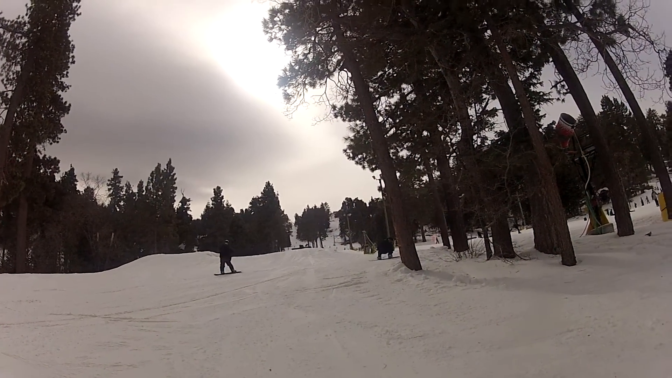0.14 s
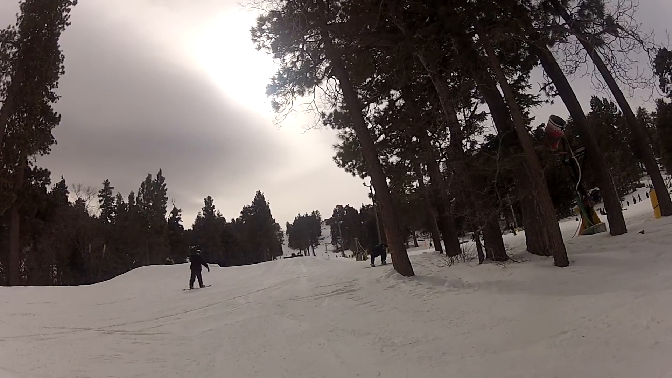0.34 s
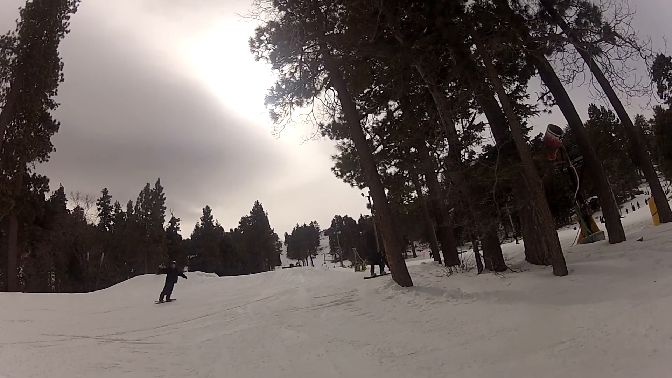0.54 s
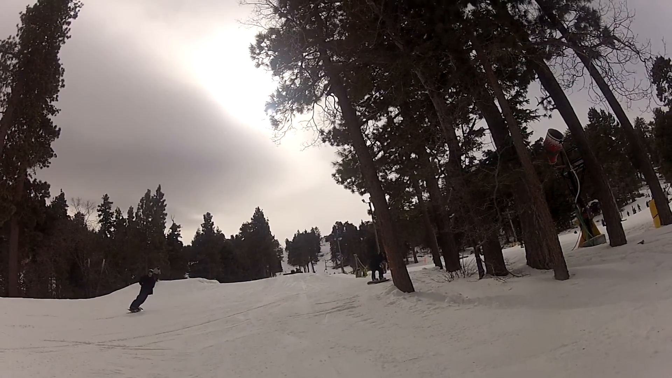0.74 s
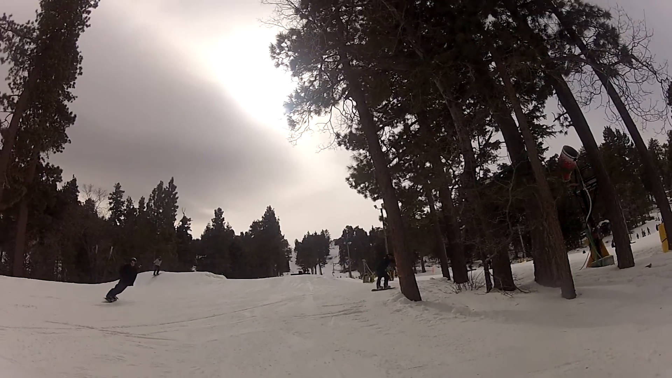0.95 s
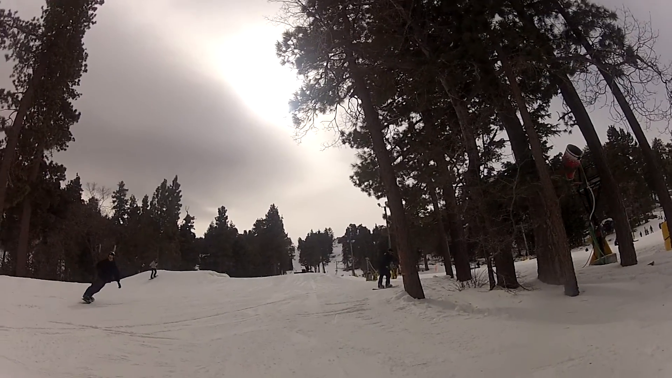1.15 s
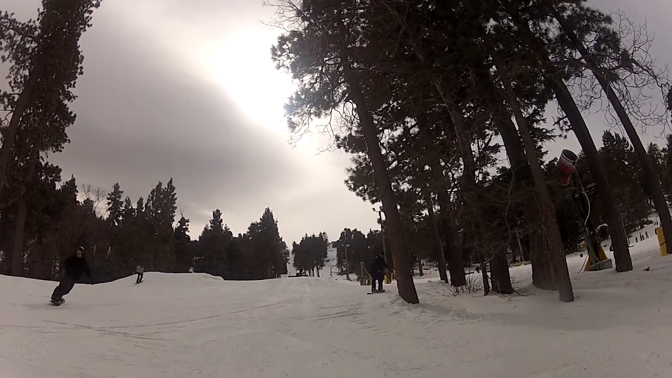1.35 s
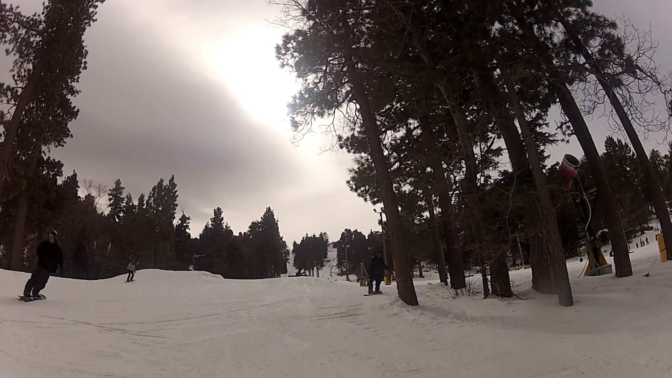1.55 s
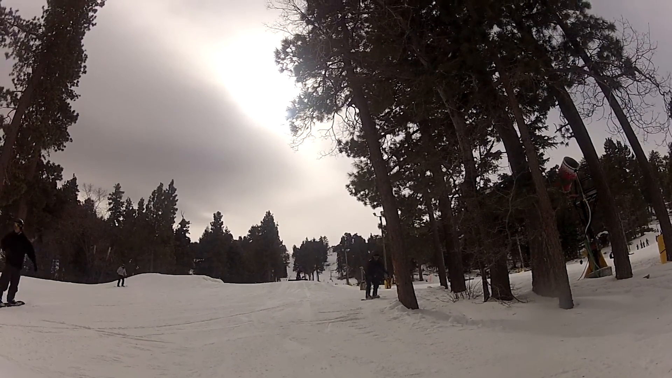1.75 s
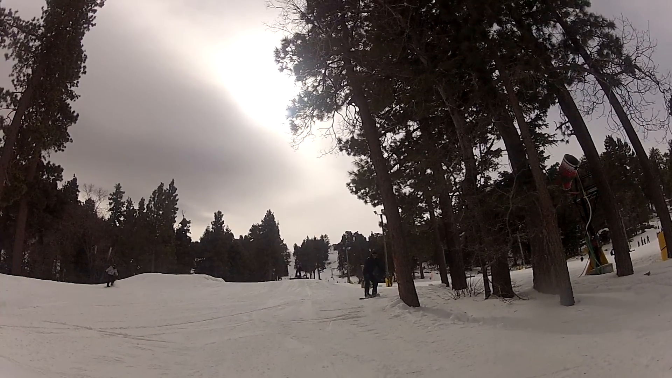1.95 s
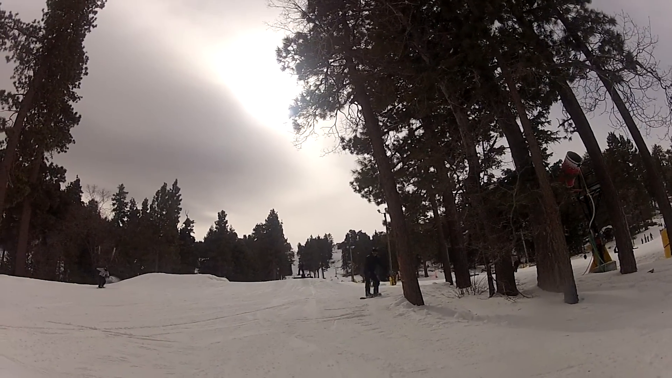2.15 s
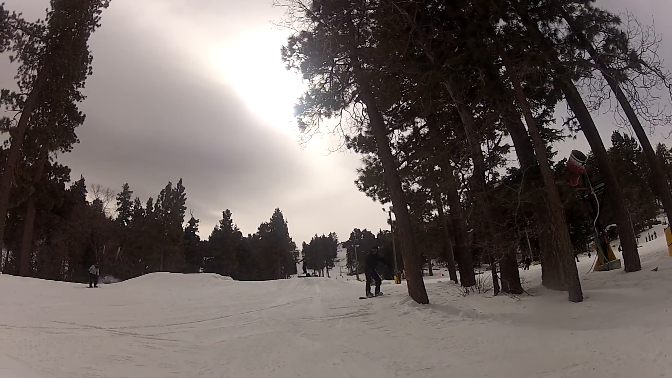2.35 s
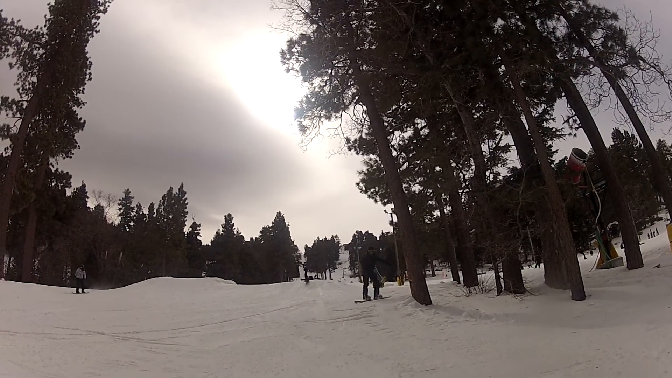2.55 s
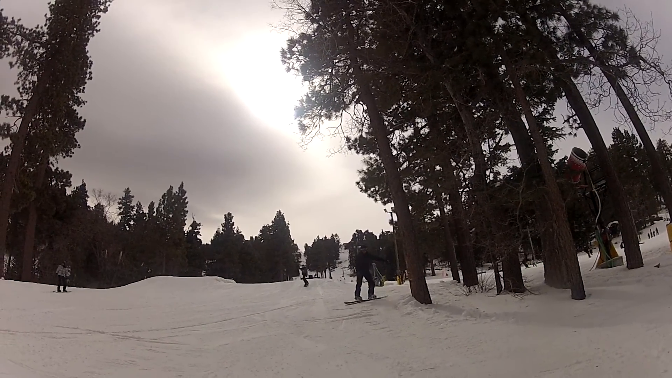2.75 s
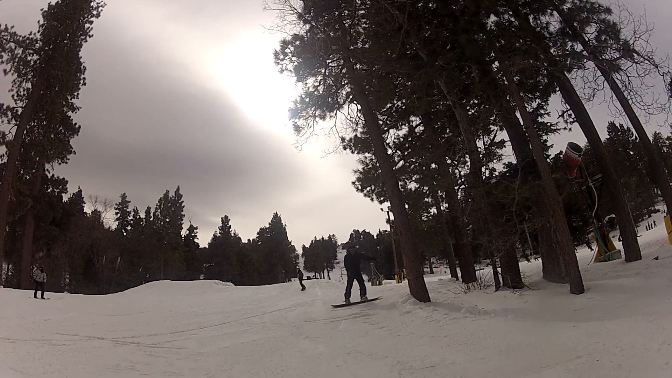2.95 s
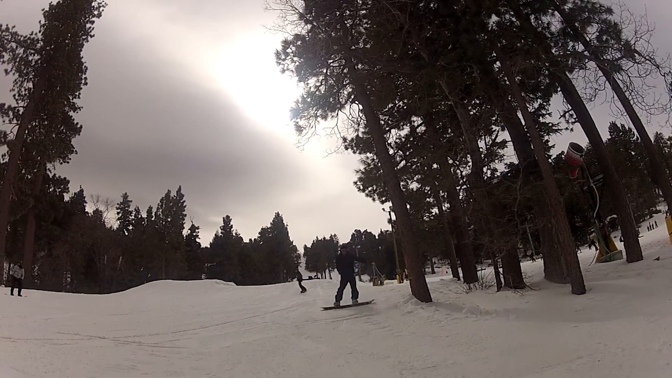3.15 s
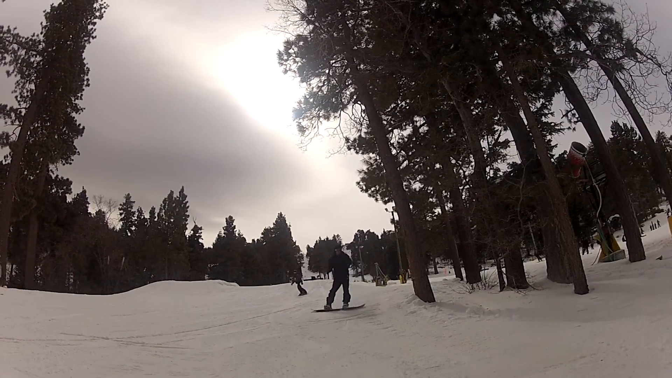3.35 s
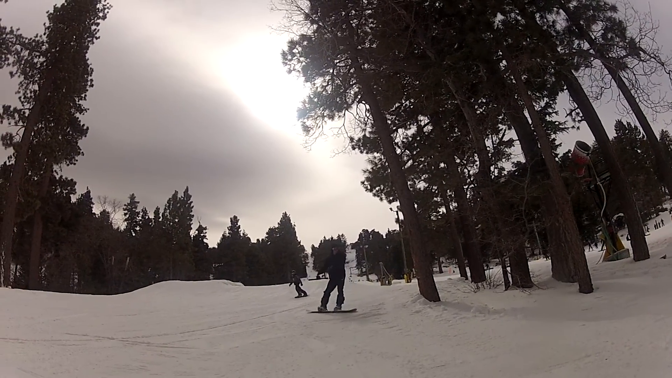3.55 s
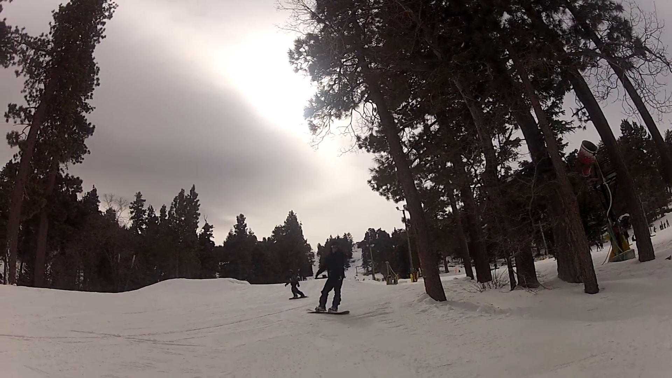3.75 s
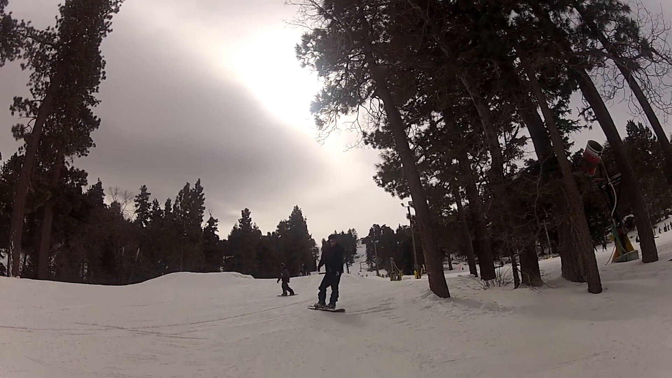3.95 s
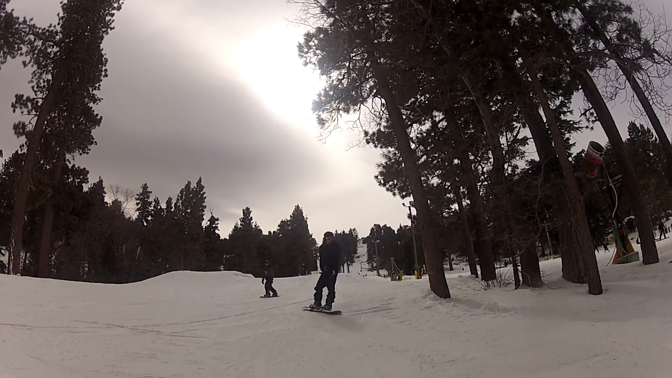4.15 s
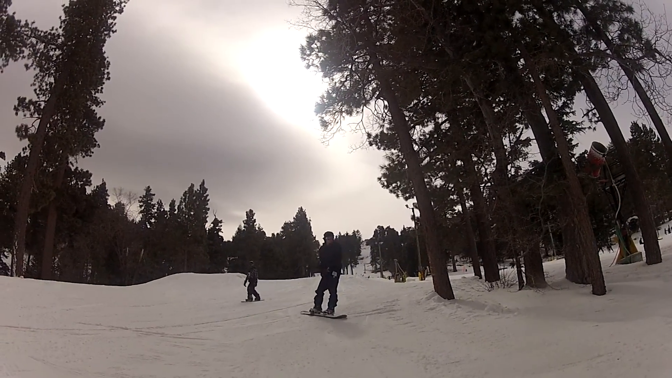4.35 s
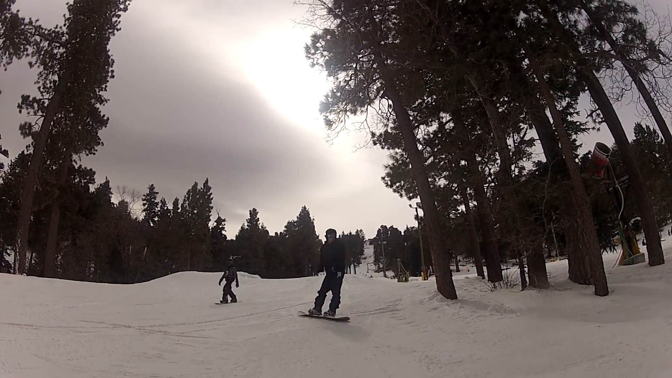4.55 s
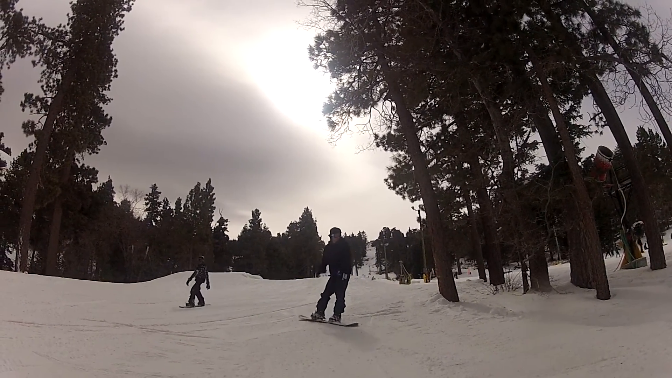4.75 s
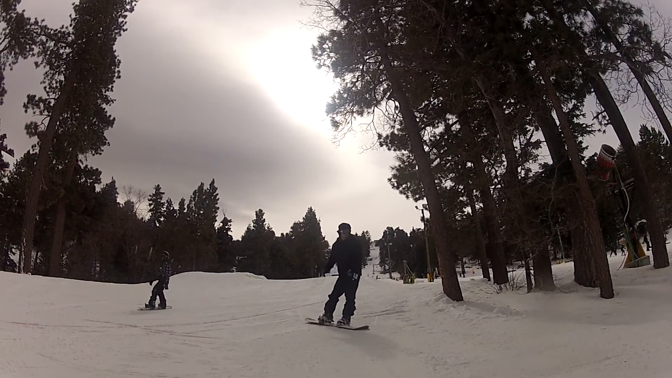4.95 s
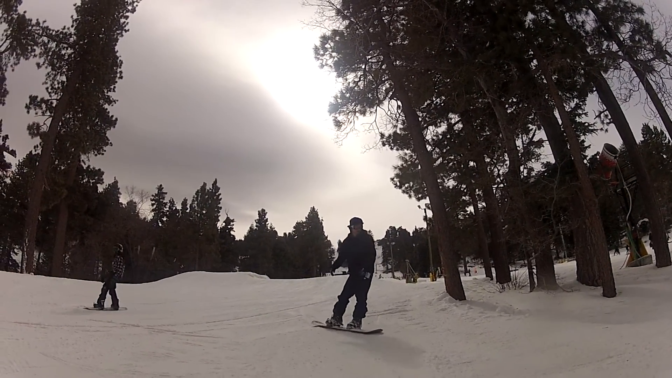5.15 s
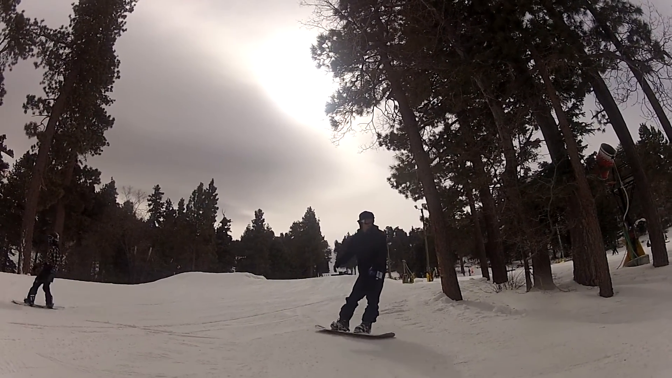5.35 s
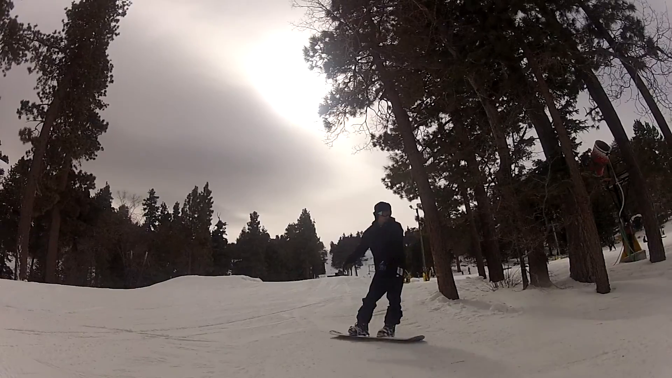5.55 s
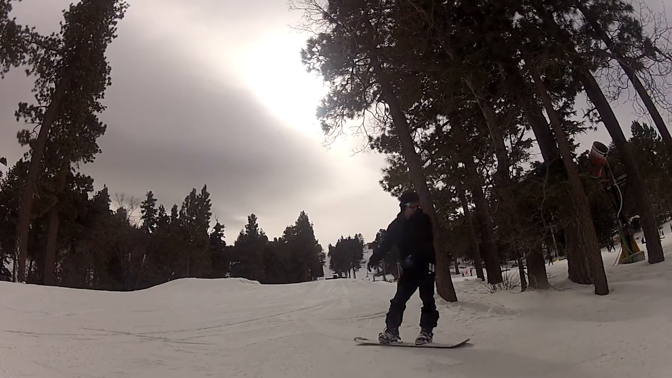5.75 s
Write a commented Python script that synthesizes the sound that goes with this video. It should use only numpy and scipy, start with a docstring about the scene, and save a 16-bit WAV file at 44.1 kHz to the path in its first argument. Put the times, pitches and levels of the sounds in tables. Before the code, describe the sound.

Light wind rumbles throughout, under the faint hiss of distant snowboards on packed snow. The microphone sits in a closed plastic case, which gives the hiss a thin, resonant colour. For the first 1.7 seconds a hand rubs and bumps the case, making close, dull knocks with a slight rattle and low wobble, strongest at about 0.3, 1.0 and 1.3 seconds. A board sweeps faintly past around 1.2 seconds. At 2.1 seconds a nearer snowboard skids with a grainy scrape, crunches at 2.4, then throws fluttering spurts of snow. From 3.6 seconds its edge carves, the hiss building to a peak near 3.9 and falling away just after 4.1. A softer knock comes at 4.5 seconds and a faint, very brief tone at 4.7. Small wind gusts and quiet gliding hiss continue to the end, near 5.8 seconds.

```python
"""A run of packed snow: snowboards hiss and crunch, and the nearest skids, then carves on its edge.
The microphone sits in a closed plastic camera case, whose resonances colour the hiss.
Early on a hand rubs and knocks the case, and its mount sways; light wind rumbles underneath.
Near the end come one more knock and a faint, brief tone."""
import sys
import numpy as np
from scipy import signal
from scipy.fft import rfft, irfft
from scipy.io import wavfile

SR = 44100
rng = np.random.default_rng(int(sys.argv[2]) if len(sys.argv) > 2 else 0)


def put_to_file(sound):
    """Save the sound as 16-bit audio at rate SR, in the file named by the first command-line argument."""
    columns = np.atleast_2d(sound).T  # one column per channel
    safe = np.clip(columns, -1, 1)
    whole_steps = np.round(safe * 32767)
    wavfile.write(sys.argv[1], SR, whole_steps.astype(np.int16))


N = 255780
TIME = np.arange(N) / SR

# spectrum of a flat board on snow: (frequency [Hz], density [dB])
GLIDE_SPECTRUM = [(500, -35), (1100, 3), (1650, -1.5), (2100, 2.5), (2350, 1.5), (2640, 4), (2950, 1),
                  (4200, -4), (6500, -6), (9500, -14.5), (15500, -8.5)]
# modes of the plastic shell: (frequency [Hz], gain [dB], t60 [s])
SHELL_MODES = [(845, -4.5, .028), (965, 0, .032), (1100, -1, .032), (1237, 1.5, .036), (1460, -2.5, .028),
               (1550, -7, .032), (2050, -12, .015), (3060, -17, .015), (3470, -17, .015),
               (10760, -15, .008), (11750, -10, .022), (12200, -9, .022), (13200, -15, .008)]


def from_db(db):
    """Decibels to gain."""
    return 10 ** (np.asarray(db) / 20)


def unit_rms(x):
    """Scale to rms 1."""
    return x / np.sqrt(np.mean(x ** 2) + 1e-20)


def since(start_s):
    """Seconds since start_s, zero before."""
    return np.maximum(TIME - start_s, 0)


def swell(peak_s, sigma_s):
    """Bell envelope, peak 1."""
    return np.exp(-.5 * ((TIME - peak_s) / sigma_s) ** 2)


def burst(start_s, length_s):
    """Contact envelope: rises to 1, dies away."""
    age = since(start_s) / length_s * np.e
    return age * np.exp(1 - age) * (TIME < start_s + 10 * length_s)


def drift(rate_hz):
    """Smooth random wander, rms 1."""
    points = 8192
    hz = np.arange(points // 2 + 1) * SR / N
    slow = irfft(rfft(rng.standard_normal(points)) / (1 + (hz / rate_hz) ** 2), points)
    return np.interp(TIME, np.linspace(0, N / SR, points), unit_rms(slow))


def coloured(x, spectrum):
    """Impose a spectral shape; white input keeps its power."""
    hz, db = np.transpose(spectrum)
    log_hz = np.log(np.maximum(np.arange(N // 2 + 1) * SR / N, 1))
    gain = from_db(np.interp(log_hz, np.log(hz), db, left=-np.inf, right=-np.inf))
    return irfft(rfft(x) * unit_rms(gain), N)


def resonant(x, bands):
    """Parallel steep-sided resonances; rms 1."""
    grid_hz = np.arange(N // 2 + 1) * SR / N
    power = sum(from_db(2 * db) / (1 + (2 * (grid_hz - hz) / width_hz) ** 4) for hz, width_hz, db in bands)
    return unit_rms(irfft(rfft(x) * np.sqrt(power), N))


def ring(drive, modes, phase_rad=0):
    """Drive modes that each ring as a decaying sine."""
    out = np.zeros(N)
    for hz, db, t60_s in modes:
        r, w = np.exp(-np.log(1000) / (t60_s * SR)), 2 * np.pi * hz / SR
        onset = [np.sin(phase_rad), r * np.sin(w - phase_rad)]
        out += from_db(db) * signal.lfilter(onset, [1, -2 * r * np.cos(w), r * r], drive + 1e-18)
    return out


def through_case(x):
    """The closed case lifts some bands and swallows others."""
    # case peaks and notches: (frequency [Hz], width [Hz], gain [dB])
    bands = [(1950, 148, 8), (2605, 87, 4), (3370, 820, 5.5), (4970, 1300, 2.5), (6000, 230, -18.5),
             (6980, 530, 2.5), (8960, 1760, 12), (9980, 490, 5.5), (12200, 4200, -5.5), (14200, 310, 7),
             (15050, 450, 5.5)]
    for hz, width_hz, db in bands:
        gain, half = from_db(db / 2), np.tan(np.pi * width_hz / SR)
        c = -2 * np.cos(2 * np.pi * hz / SR)
        x = signal.lfilter([1 + half * gain, c, 1 - half * gain], [1 + half / gain, c, 1 - half / gain], x)
    return x


def snow_grains(per_s, spread_db, powder_db):
    """Crystals snap at random with uneven force, over the hiss of loose powder."""
    sizes = from_db(spread_db * np.minimum(rng.exponential(1, N), 4)) * rng.choice([-1, 1], N)
    snaps = sizes * (rng.random(N) < per_s / SR)
    return unit_rms(unit_rms(snaps) + from_db(powder_db) * rng.standard_normal(N))


def far_glide():
    """Distant boards run flat over the grains with a soft, wavering hiss."""
    # glide loudness: (time [s], level [dB])
    levels = [(0, -66.5), (.52, -70), (.95, -67), (1.35, -68), (1.7, -69), (1.95, -66.5), (2.5, -68),
              (4.4, -67), (5.55, -67), (5.8, -63.5)]
    grains = snow_grains(per_s=5000, spread_db=3.5, powder_db=1.5)
    hiss = unit_rms(through_case(coloured(grains, GLIDE_SPECTRUM)))
    level_db = np.interp(TIME, *np.transpose(levels)) + 0.88 * drift(rate_hz=11)
    return from_db(level_db) * hiss


def low_rush(level_db=-68, swell_db=2.5):
    """The run's low rush swells as the near board turns."""
    # rush: (frequency [Hz], density [dB])
    spectrum = [(120, 2), (300, 2), (450, 3), (650, -1), (1200, -7), (1700, -11), (3000, -37)]
    envelope = from_db(level_db + swell_db * swell(peak_s=2.65, sigma_s=0.73))
    return envelope * coloured(rng.standard_normal(N), spectrum)


def wind(breeze_db=-55.5, flutter_db=-64, buffet_gain_db=-14):
    """Envelopes of rumble and buffeting on the case: steady breeze plus gusts."""
    # gusts: (time [s], rumble [dB], sigma [s])
    gusts = [(2.203, -48, 0.08), (2.816, -50, 0.062), (3.79, -49, 0.056), (4.752, -47.5, 0.062),
             (5.35, -49, 0.052)]
    gusting = sum(from_db(db) * swell(s, sigma_s) for s, db, sigma_s in gusts)
    rumble = np.hypot(from_db(breeze_db), gusting)
    buffeting = np.hypot(from_db(flutter_db), from_db(buffet_gain_db) * gusting)
    return rumble, buffeting


def wind_and_hand(firm_db=-62.5, rock_gain_db=7, shell_gain_db=-11.5):
    """Wind and hand rock and rub the case; a firm grip sticks and slips, waking the shell."""
    # the hand's hold: (time [s], rubbing [dB])
    grip = [(.15, -69), (.3, -59.5), (.7, -58.5), (.82, -58.5), (1.0, -51), (1.22, -62), (1.5, -57.5),
            (1.75, -69)]
    # rocking case: (frequency [Hz], density [dB])
    rumble_spectrum = [(12, -29), (25, -3), (35, 5.5), (50, -8.5), (75, -12.5), (120, -22.5), (250, -57)]
    # rubbed case: (frequency [Hz], density [dB])
    rub_spectrum = [(50, -5), (90, -3), (135, 1), (190, -1.5), (260, -2), (380, -9.5), (500, -20.5),
                    (900, -33)]
    hand_db = np.interp(TIME, *np.transpose(grip))
    hand = from_db(hand_db) * (TIME < grip[-1][0])
    wind_rumble, buffeting = wind()
    rocking = np.hypot(wind_rumble, from_db(rock_gain_db) * hand)
    slips = from_db(2.9 * drift(rate_hz=26))
    rumble = rocking * coloured(rng.standard_normal(N), rumble_spectrum)
    rub = np.hypot(buffeting, hand) * slips * coloured(rng.standard_normal(N), rub_spectrum)
    firmness = 1 / (1 + from_db(2 * (firm_db - hand_db)))
    scratch = firmness * unit_rms(ring(slips * rng.standard_normal(N), SHELL_MODES))
    return rumble + rub + from_db(shell_gain_db) * hand * scratch


def knocks(sway_hz=37.2, sway_t60_s=0.31, crack_loss_db_per_s=42000):
    """Each knock thumps the body, sways the mount and scuffs the shell; a hard one also cracks."""
    # blows: (time [s], thud [relative dB], sway [dB], contact [s], rattle [relative dB], scuff [s])
    blows = [(0.302, -18.5, -21.5, 0.0047, -43.5, 0.0049), (.454, -38.5, -58, 0.00055, -39, 0.0039),
             (0.726, -51, -62, 0.001, -50, 0.0068), (0.899, -45, -52, 0.001, -47, 0.0084),
             (0.997, -31, -32.5, 0.003, -60, 0.0077), (1.042, -16, -24.5, 0.00027, -23, 0.0051),
             (1.094, -20.5, -67, 0.0034, -51, 0.011), (1.318, -53, -38, 0.00087, -42, 0.015),
             (1.332, -11.5, -25, 0.004, -44.5, 0.015), (1.593, -26, -40, 0.0013, -39.5, 0.0053),
             (4.512, -31, -37, 0.0017, -53, 0.003)]
    # low modes of the case: (frequency [Hz], gain [dB], t60 [s])
    body_modes = [(142, -3.5, 0.041), (181, -2.5, 0.018), (241.4, -2, 0.068), (389, -8.5, 0.086)]
    # loose part, sizzling as the case shakes: (frequency [Hz], gain [dB], t60 [s])
    loose_modes = [(10550, -57, .018), (11200, -57, .018), (11840, -55, 0.03), (12100, -55, 0.03),
                   (12950, -65, .018), (13400, -70, .018)]
    # hard crack: (frequency [Hz], density [dB])
    crack_spectrum = [(800, -36), (1300, 6.5), (1750, -31), (2100, -5.5), (3500, 2), (4400, -22),
                      (5400, -15.5), (6000, -34), (6600, -16.5), (7700, -24), (8700, -5), (9700, -17),
                      (11000, -8), (13500, -21), (15500, -12)]
    thump, shove, scuff, snap = np.zeros((4, N))
    for s, thud_db, sway_db, contact_s, rattle_db, scuff_s in blows:
        push = swell(s + contact_s, contact_s / 3)   # longer contact, duller thud
        push /= push.sum()
        thump += from_db(thud_db + 0.5) * push
        shove += from_db(sway_db) * push
        graze = burst(s - .001, scuff_s)
        scuff += from_db(rattle_db - 30.5) * graze
        snap += from_db(rattle_db + 1 - crack_loss_db_per_s * contact_s) * graze
    # the heavy body follows the slow part of a blow, the stiff shell the fast part
    slow = signal.cheby2(6, 34, 525, fs=SR, output="sos")
    fast = signal.butter(6, 630, "high", fs=SR, output="sos")
    crest_rad = np.pi / 2   # a blow gives full speed at once
    body = signal.sosfilt(slow, ring(thump, body_modes, crest_rad))
    sway = signal.sosfilt(slow, ring(shove, [(sway_hz, 0, sway_t60_s)], crest_rad))
    rattle = signal.sosfilt(fast, ring(scuff * rng.standard_normal(N), SHELL_MODES))
    shaking = body + from_db(-12) * sway
    sizzle = ring(shaking * rng.standard_normal(N), loose_modes)
    crack = coloured(snap * rng.standard_normal(N), crack_spectrum)
    return rattle + sizzle + crack - body - sway


def first_rider(peak_db=-71.5):
    """A board sweeps past; its hiss swells and fades."""
    # hiss bands: (frequency [Hz], width [Hz], gain [dB])
    bands = [(2250, 580, -5), (3370, 470, 0.5), (8600, 580, -7.5)]
    return from_db(peak_db) * swell(peak_s=1.2, sigma_s=0.35) * resonant(rng.standard_normal(N), bands)


def crunches(ping_db=-17.5, t60_cycles=65, highpass_hz=2470):
    """Crust breaks under a board: a tight cluster of snaps with a short ring."""
    # breaking crusts: (time [s], drive [dB], length [s], ring [Hz])
    crusts = [(0.881, -58.5, 0.0047, 5060), (0.957, -55, 0.003, 7000), (2.377, -47.5, 0.0042, 2760),
              (2.442, -59.5, 0.022, 2200), (3.233, -55, 0.0051, 5100), (4.889, -64.5, 0.017, 3120),
              (4.947, -64.5, 0.019, 2730)]
    snaps, pings = np.zeros((2, N))
    for s, db, length_s, hz in crusts:
        cluster = from_db(db) * burst(s, length_s) * rng.standard_normal(N)
        snaps += cluster
        pings += ring(cluster, [(hz, ping_db, t60_cycles / hz)])
    thin = signal.butter(2, highpass_hz, "high", fs=SR, output="sos")   # thin crust has little body
    return through_case(signal.sosfilt(thin, coloured(snaps, GLIDE_SPECTRUM)) + pings)


def crumbs(per_s=24, decay_s=0.0027):
    """Lumps of snow burst at random in short puffs; rms 1."""
    bursts = (rng.random(N) < per_s / SR) * rng.uniform(0.42, 1, N)
    puffs = signal.lfilter([1], [1, -np.exp(-1 / (decay_s * SR))], bursts + 1e-18)
    return unit_rms(puffs * rng.standard_normal(N))


def skid_hiss():
    """The board scrapes sideways over grains and lumps; bumps make it flutter."""
    # skid: (frequency [Hz], density [dB])
    spectrum = [(700, -61), (1300, -1.5), (1750, -3), (2020, 4), (2330, -7), (2640, 2), (3000, -5.5),
                (4300, -14.5), (5400, -7), (6500, -8), (8300, -22.5), (9400, -17), (15500, -17)]
    snow = snow_grains(per_s=1700, spread_db=2, powder_db=2) + from_db(-7.5) * crumbs()
    return unit_rms(through_case(coloured(snow, spectrum))) * from_db(2.3 * drift(rate_hz=37))


def skid_envelope(start_s=2.114, attack_s=0.15, hold_s=0.37, peak_db=-61.5, fade_db_per_s=18.5):
    """The skid digs in quickly, then fades as the edge takes over."""
    attack = np.minimum(since(start_s) / attack_s, 1)
    return attack * from_db(peak_db - fade_db_per_s * since(start_s + hold_s))


def carve_hiss():
    """The edge shaves the snow; bumps make it flutter."""
    # shaved snow heard through the case: (frequency [Hz], width [Hz], gain [dB])
    bands = [(1950, 200, 0), (2380, 460, -3), (3060, 260, 1.5), (3460, 280, -4), (4050, 400, -13),
             (4980, 600, -9.5), (6950, 560, -12), (8250, 800, -15), (8980, 320, -8.5), (9750, 640, -15),
             (13980, 260, -16), (14500, 460, -19), (15100, 280, -11)]
    snow = snow_grains(per_s=9000, spread_db=3.5, powder_db=-4.5)
    return resonant(snow, bands) * from_db(1.57 * drift(rate_hz=97))


def carve_envelope(bite_s=3.558, attack_s=0.012, full_s=3.906, let_go_s=4.075, bite_db=-63.5):
    """The edge bites, presses ever harder, eases and lets go."""
    press_db_per_s, ease_db_per_s, let_go_db_per_s = 33, 22, 226
    attack = np.minimum(since(bite_s) / attack_s, 1)
    press_db = press_db_per_s * (since(bite_s) - since(full_s))
    release_db = ease_db_per_s * since(full_s) + let_go_db_per_s * since(let_go_s)
    return attack * from_db(bite_db + press_db - release_db)


def near_board():
    """One turn: a skid, spurts of snow over bumps, then a long carve."""
    # spurts: (time [s], level [dB], sigma [s], edge set [0-1])
    spurts = [(2.722, -59, 0.031, 0.55), (2.907, -62, 0.043, 1), (3.093, -63, 0.025, 0.5),
              (3.25, -62.5, 0.094, 1), (3.45, -66.5, 0.085, 0.8)]
    skid, carve = skid_envelope(), carve_envelope()
    for s, db, sigma_s, edge in spurts:
        spurt = from_db(db) * swell(s, sigma_s)
        skid = np.hypot(skid, np.sqrt(1 - edge) * spurt)
        carve = np.hypot(carve, np.sqrt(edge) * spurt)
    return skid * skid_hiss() + carve * carve_hiss()


def faint_tone(peak_s=4.74, half_s=0.035, top_hz=620, drop_hz=57.4, level_db=-63):
    """One soft tone rises and falls in an arch."""
    away = np.minimum(((TIME - peak_s) / half_s) ** 2, 5)
    hz = top_hz - drop_hz * away
    return from_db(level_db) * np.exp(-.5 * away ** 2) * np.sin(2 * np.pi * np.cumsum(hz) / SR)


def microphone_hiss(level_db=-79.5):
    """The microphone's own faint noise."""
    # self-noise: (frequency [Hz], density [dB])
    spectrum = [(60, 1.5), (300, -0.5), (550, -7), (1200, -10.5), (2500, -13.5), (4500, -11.5), (5400, -16),
                (6000, -34), (6900, -17), (8100, -17.5), (9500, -42)]
    return from_db(level_db) * coloured(rng.standard_normal(N), spectrum)


def scene():
    """Nearly mono: only the microphone's hiss differs between the sides."""
    case = knocks() + wind_and_hand()
    boards = far_glide() + near_board() + low_rush() + first_rider() + crunches()
    mid = case + boards + faint_tone()
    side = microphone_hiss()
    return np.array([mid + side, mid - side])


def record(dry):
    """Steep low-pass."""
    cutoff_hz = 15250
    return signal.sosfilt(signal.ellip(12, .2, 80, cutoff_hz, fs=SR, output="sos"), dry)


dry = scene()
out = record(dry)
put_to_file(out)
```